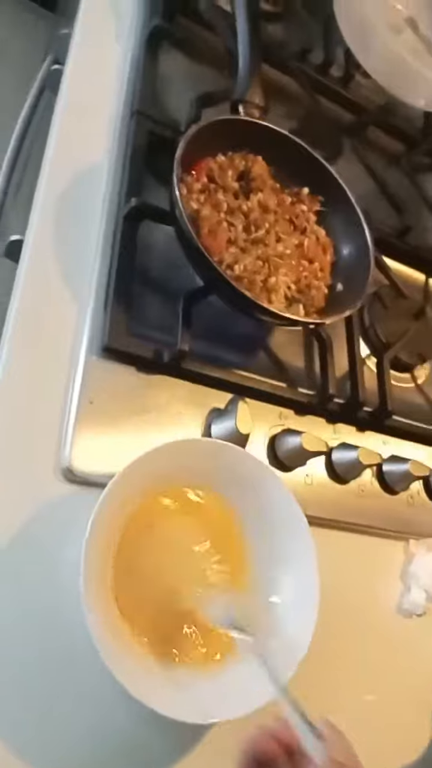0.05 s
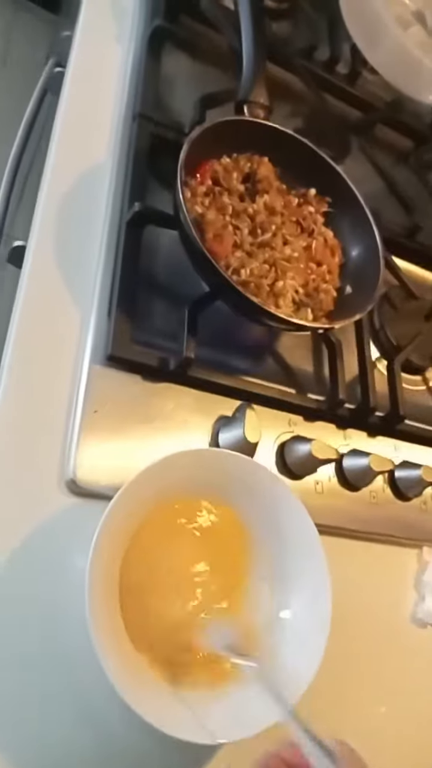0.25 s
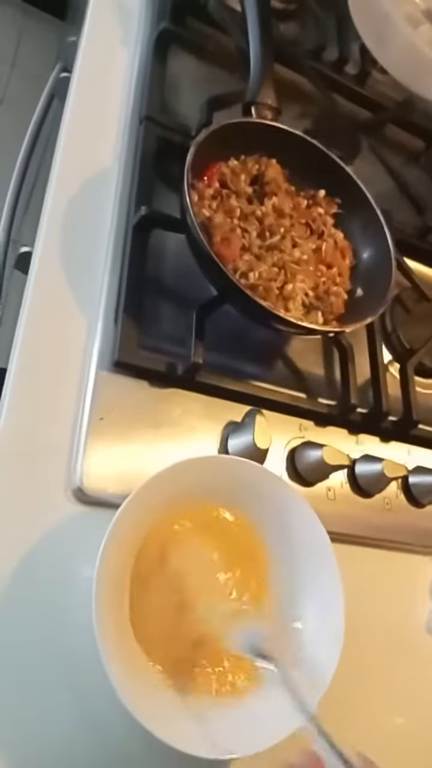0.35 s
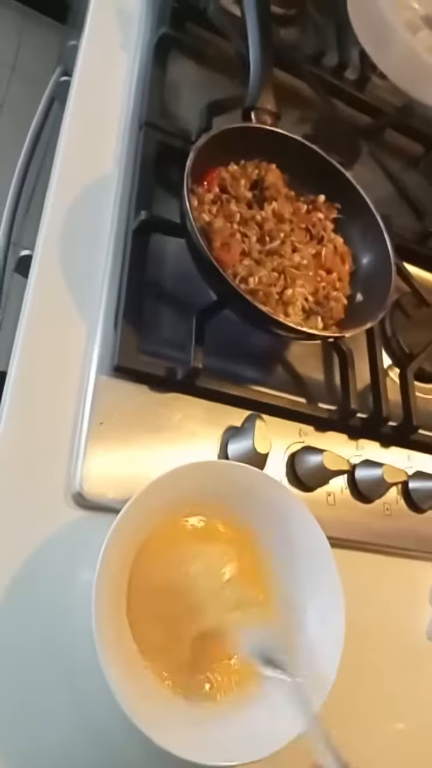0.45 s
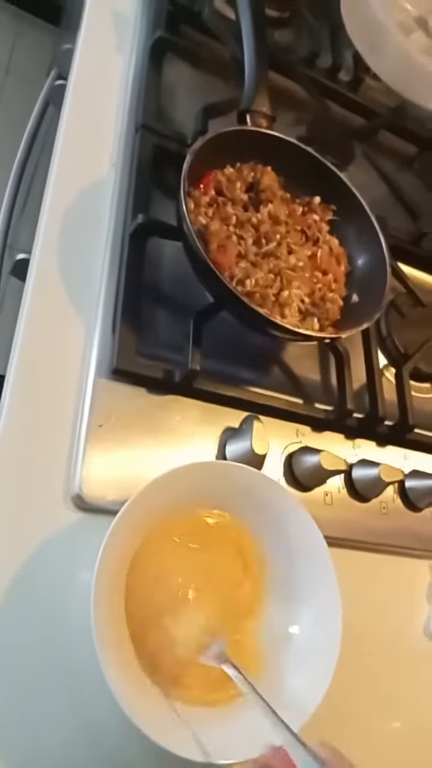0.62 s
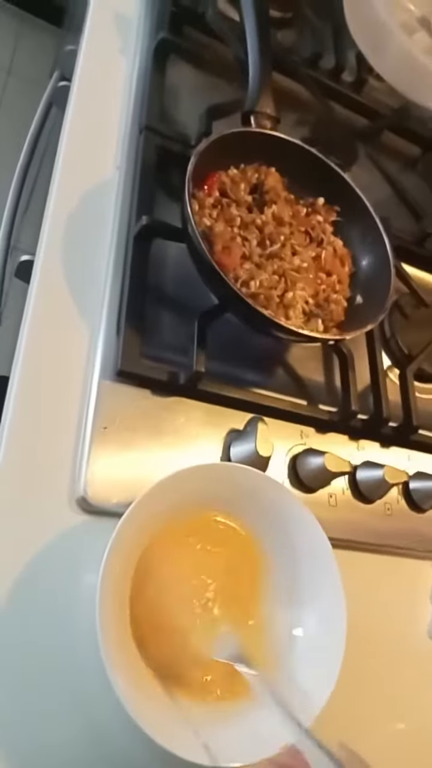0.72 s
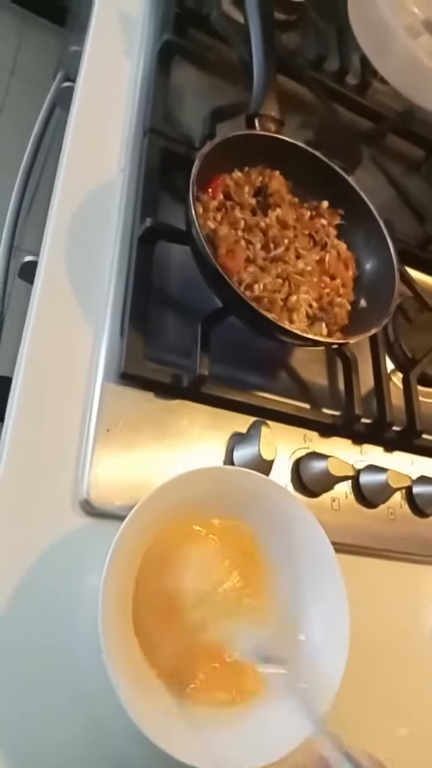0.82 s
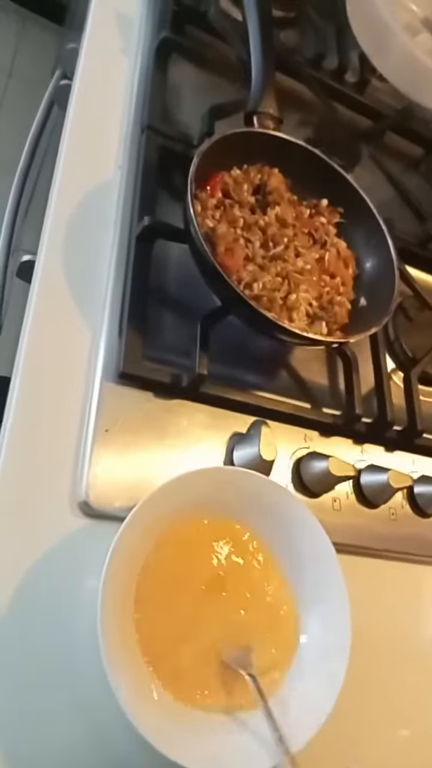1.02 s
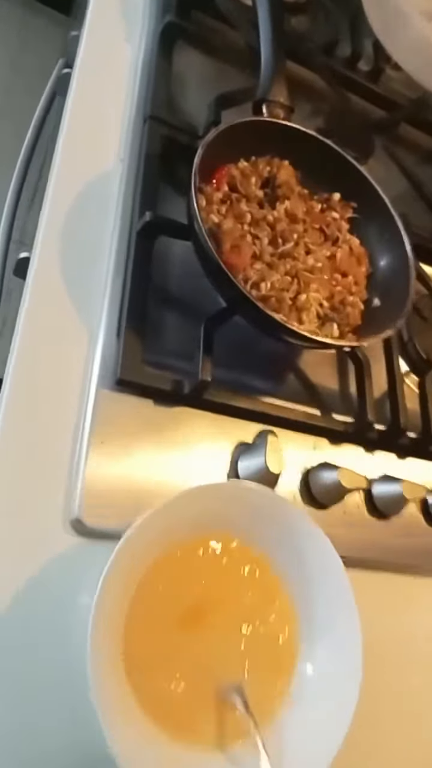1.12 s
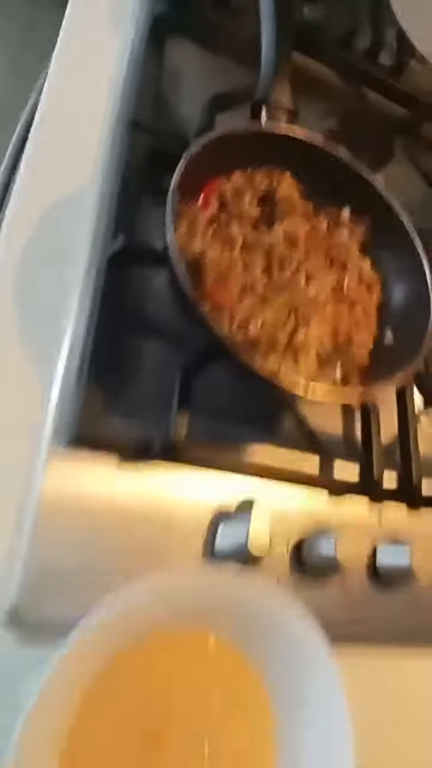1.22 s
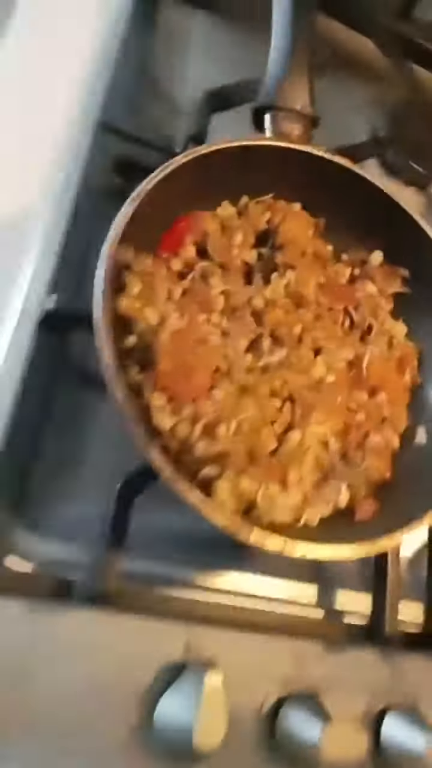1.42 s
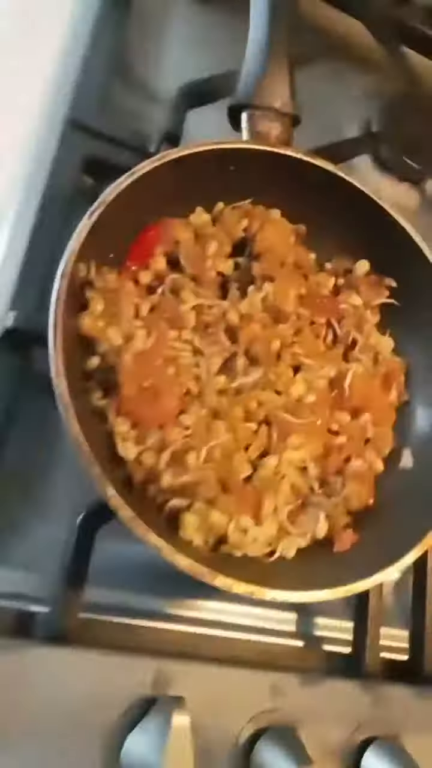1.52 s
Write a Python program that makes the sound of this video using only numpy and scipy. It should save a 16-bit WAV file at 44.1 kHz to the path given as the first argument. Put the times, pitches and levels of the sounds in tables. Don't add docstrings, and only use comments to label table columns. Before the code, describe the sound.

Beating eggs with a steel fork in a ceramic bowl: from 0 to about 1.05 seconds, ten dry rattling strokes a second, uneven in force, with wet bubbly slops and low counter thumps. Around 1.12 the fork bounces brightly on the ringing rim, then slides briefly and damps it. Faint pan sizzle and kitchen hum continue, with small fat ticks from 1.25 to 1.52. Close microphone, short room echo.

```python
import sys
import numpy as np
from scipy import signal
from scipy.fft import rfft, irfft
from scipy.io import wavfile
from scipy.ndimage import uniform_filter1d

SR = 44100
rng = np.random.default_rng(int(sys.argv[2]) if len(sys.argv) > 2 else 0)


def magnitude_from_level(level_db):
    exponent = np.asarray(level_db, float) / 20
    return 10 ** exponent


def put_to_file(sound):
    columns = np.atleast_2d(sound).T
    safe = np.clip(columns, -1, 1)
    whole_steps = np.round(safe * 32767)
    wavfile.write(sys.argv[1], SR, whole_steps.astype(np.int16))


N = 68355
LEAD = 2048

# frequency_hz, density_db
KITCHEN_COLOUR = [(40, -5), (115, 1), (200, -10.5), (1100, -22), (2100, -15.5), (4500, -20.5), (7500, -36),
                  (12000, -35.5)]
# frequency_hz, density_db
ECHO_COLOUR = [(60, -6), (300, 8), (1000, 1.5), (2000, -4), (5000, -1.5), (7500, -1), (10000, -2.5),
               (14000, -3.5)]
# start_s, level_db, pitch_hz
PAN_TICKS = [
    (1.249, -32.5, 1800),
    (1.272, -48, 2400),
    (1.292, -39, 1900),
    (1.298, -37, 3810),
    (1.339, -64, 6400),
    (1.353, -38.5, 4560),
    (1.369, -45.5, 890),
    (1.424, -38, 4150),
    (1.524, -41.5, 2080),
]
# start_s, level_db, crack_db
RIM_KNOCKS = [
    (1.117, -25.5, -5),
    (1.1192, -17.5, -10),
    (1.123, -12.5, -9),
    (1.126, -15.5, -22),
    (1.138, -22.5, -4.5),
]
# frequency_hz, peak_db, t60_s
RIM_MODES = [(773, -22.5, 0.22), (1800, -19, 0.038), (2135, -24.5, 0.061), (3304, -20.5, 0.39),
             (3250, -14.5, 0.19), (3380, -25, .14), (3470, -20.5, 0.049), (4570, -25, 0.065),
             (4924, -26, 0.32), (4958, -19, .13), (6845, -22.5, 0.082), (8349, -32.5, 0.16),
             (9350, -21.5, 0.057), (11630, -23.5, 0.12)]
# frequency_hz, density_db
SCRAPE_COLOUR = [(400, 0), (1800, -2.5), (4800, -5.5), (5900, -41), (6900, -8), (7900, -14), (9300, -1.5),
                 (13000, -13.5)]
# start_s, level_db, length_s, bubble_pitch_hz
EGG_SLOPS = [(.0, -43, 0.027, 700), (0.1, -34, 0.029, 690), (0.199, -29, 0.045, 724),
             (0.289, -31, 0.027, 759), (0.387, -46, 0.031, 712), (0.48, -45, 0.031, 637),
             (0.583, -39.5, 0.024, 643), (0.687, -33.5, 0.039, 923), (.788, -37, .03, 660),
             (0.874, -32.5, .04, 788), (0.973, -48.5, 0.044, 600), (1.048, -48.5, 0.027, 910),
             (1.144, -32.5, 0.049, 648)]
# start_s, level_db, knock_pitch_hz, treble_db, thump_db
FORK_STROKES = [(-.012, -21.5, 1614, -3, -8), (0.0863, -22.5, 1590, -2, -7.5),
                (0.1782, -29.5, 1860, -8, -31), (.189, -18.5, 1654, -6, -9), (0.2832, -15.5, 1590, -8, -20),
                (0.378, -19.5, 1695, -5, -7), (0.4746, -17, 2700, -8.5, -11),
                (0.5769, -17.5, 2107, -2, -8.5), (.6744, -18.5, 2340, -2, -8), (0.7708, -24, 2073, -1, -2),
                (.866, -24, 1583, -1, -2), (0.9635, -12.5, 1900, -2.5, -8), (1.045, -26, 1800, -18, -12)]
# frequency_hz, level_db, t60_s
BOTTOM_MODES = [(1003, -19, 0.044), (1590, -12.5, .045), (1900, -11, 0.014), (2134, -9, 0.02),
                (2450, -30.5, 0.036), (3010, -22, 0.018)]
# frequency_hz, level_db, t60_s
FORK_MODES = [(4200, -10, .02), (4700, 0, .03), (5500, -6, .018), (5800, -9, .02), (6870, -12, .015),
              (8000, -14, .015), (9170, -7, .022), (9630, -7, .022), (10200, -12, .015), (12300, -12, .015),
              (13610, -8, .03)]
# frequency_hz, level_db, t60_s
TINE_MODE = (17000, -27.5, 0.28)
# frequency_hz, level_db, t60_s
COUNTER_MODES = [(92, -11.5, 0.073), (138.5, -1.5, 0.067), (273.6, -9.5, 0.039), (330, 2, 0.034),
                 (401, -4.5, 0.045)]
# frequency_hz, density_db
CRACK_COLOUR = [(1000, -14.5), (2500, -5), (4700, 4), (6200, -6), (7800, -3), (9500, 2), (13500, -13),
                (14600, -36)]
# frequency_hz, density_db
RATTLE_COLOUR = [(200, -5.5), (400, -5.5), (1100, -18.5), (1550, 6), (2200, 1), (3000, -16.5), (5000, -24),
                 (9000, -27.5)]

KITCHEN_DB, FLICKER_DB = -50.5, 1
SIZZLE_DB, SIZZLE_PER_S, SIZZLE_SCATTER_DB = -63, 2300, 2
SPIT_S, SPIT_LENGTH_S, SPIT_DB, SPIT_HZ = 0.536, 0.033, -47.5, 9800
RIM_TOUCH_S, RIM_DAMPED_S, RIM_DAMP_DB = 0.004, 1.145, -10
SCRAPE_S, SCRAPE_LENGTH_S, SCRAPE_DB = 1.14, 0.045, -34
BUBBLES_PER_S, BUBBLE_CYCLES, BUBBLE_OCTAVES, BUBBLE_TILT_DB = 900, 2.19, 0.67, -6.5
SPLASH_DB, SLAP_DB = -15.5, -5
TINE_GAP_S, TINE_RISE_DB, TINE_FALL_DB, TINE_SCATTER_DB = 0.0013, 7.5, 9.5, 2
KNOCK_T60_S, THUMP_LATE_S, MODE_SCATTER_DB = 0.03, 0.002, 3.5
CRACK_DB, CRACK_T60_S, GRIT_DB, GRIT_T60_S = -2, 0.028, -13.5, 0.14
RATTLE_DB, RATTLE_T60_S = -6, 0.1
ECHO_DB, ECHO_T60_S, RIM_ECHO_DB = -14, 0.32, -12
SIDE_DB, SIDE_HZ = -25, 4600
LOW_CUT_HZ, QUIET_TOP_HZ, TOP_HZ = 70, 13200, 14400


def unit(x):
    return x / np.sqrt(np.mean(x ** 2) + 1e-30)


def colour(x, table):
    hz, db = np.array(table, float).T
    f = np.fft.rfftfreq(len(x), 1 / SR) + 1
    return irfft(rfft(x) * magnitude_from_level(np.interp(np.log(f), np.log(hz), db)), len(x))


def cut(x, hz):
    return signal.sosfilt(signal.ellip(8, 0.3, 60, hz, fs=SR, output="sos"), x)


def fade(t60, count=8192):
    return np.exp(-np.log(1000) * np.arange(count) / SR / max(t60, 1e-3))


def hold(length, release):
    t = np.arange(8192) / SR
    return np.minimum(t / 0.0046, 1) * magnitude_from_level(-60 * np.maximum(t - length, 0) / release)


def ring(modes, scatter_db, detune=0, count=8192):
    chance = rng.standard_normal((len(modes), 2))
    t = np.arange(count) / SR
    out = np.zeros(count)
    for (hz, db, t60), (a, b) in zip(modes, chance):
        tone = np.sin(2 * np.pi * hz * (1 + detune * b) * t)
        out += magnitude_from_level(db + scatter_db * a) * fade(t60, count) * tone
    return out


def crack(t60, table=CRACK_COLOUR):
    return unit(colour(rng.standard_normal(8192), table)) * fade(t60)


def add(out, s, x):
    i = int(round(s * SR)) + LEAD
    out[i:i + len(x)] += x[:len(out) - i]


def kitchen():
    out = np.zeros(N + LEAD)
    for hz in 40 * 2.0 ** np.arange(9):
        edges = [hz / 1.31, min(hz * 1.39, 16000)]
        octave = signal.butter(2, edges, "bandpass", fs=SR, output="sos")
        band = signal.sosfilt(octave, rng.standard_normal(N + LEAD))
        walk = uniform_filter1d(rng.standard_normal(N + LEAD), size=1500)
        walk = unit(uniform_filter1d(walk, size=1500))
        out += band * magnitude_from_level(FLICKER_DB * walk)
    return magnitude_from_level(KITCHEN_DB) * unit(colour(out, KITCHEN_COLOUR))


def pan():
    out = np.zeros(N + LEAD)
    for s, db, hz in PAN_TICKS:
        tick = ring([(hz, 0, 0.01), (1.2 * hz, -4, 0.008)], 0)
        add(out, s, magnitude_from_level(db) * (tick + magnitude_from_level(-18) * crack(0.008)))
    spit_colour = [(0.85 * SPIT_HZ, -30), (SPIT_HZ, 0), (1.12 * SPIT_HZ, -30)]
    add(out, SPIT_S, magnitude_from_level(SPIT_DB) * crack(1, spit_colour) * hold(SPIT_LENGTH_S, 0.03))
    chance, sign, size = rng.random((3, N + LEAD))
    pops = (chance < SIZZLE_PER_S / SR) * np.sign(sign - 0.5)
    pops = pops * magnitude_from_level(-SIZZLE_SCATTER_DB * np.log(size + 1e-9))
    return out + magnitude_from_level(SIZZLE_DB) * unit(colour(pops, CRACK_COLOUR))


def rim():
    touch, noise, tone = np.zeros((3, N + LEAD))
    for s, db, crack_db in RIM_KNOCKS:
        add(touch, s, magnitude_from_level(db) * rng.standard_normal(512) * fade(RIM_TOUCH_S, 512))
        clack = magnitude_from_level(crack_db) * crack(0.056, SCRAPE_COLOUR) * (1 - fade(0.006))
        add(noise, s, magnitude_from_level(db) * (clack + magnitude_from_level(-27) * ring(COUNTER_MODES, 0.82)))
    for hz, db, t60 in RIM_MODES:
        mode = signal.fftconvolve(touch, ring([(hz, 0, t60)], 0, count=22050))[:N + LEAD]
        tone += magnitude_from_level(db) * mode / abs(mode).max()
    add(noise, SCRAPE_S, magnitude_from_level(SCRAPE_DB) * crack(1, SCRAPE_COLOUR) * hold(SCRAPE_LENGTH_S, 0.092))
    t = (np.arange(N + LEAD) - LEAD) / SR
    damped = np.clip((t - RIM_DAMPED_S) / 0.0021, 0, 1)
    return cut(noise, 13100) + tone * magnitude_from_level(RIM_DAMP_DB * damped)


def slops():
    out = np.zeros(N + LEAD)
    t = np.arange(1024) / SR
    for s, db, length, hz in EGG_SLOPS:
        for when, size, loudness, keep in rng.random((60, 4)):
            if keep >= BUBBLES_PER_S * 2 * length / 60:
                continue
            octave = BUBBLE_OCTAVES * (3.415 * size ** 2 - 0.7)
            f = hz * 2 ** octave
            bubble_db = db - 55 * max(when - 0.35, 0) + BUBBLE_TILT_DB * abs(octave) + 7.74 * loudness
            swell = min(when / 0.05, 1) * magnitude_from_level(bubble_db)
            chirp = np.sin(2 * np.pi * f * t * (1 + 0.032 * f * t))
            bubble = chirp * np.exp(-t * f / BUBBLE_CYCLES) * np.minimum(t * f, 1)
            add(out, s + 2 * when * length, swell * bubble)
        rise = 1 - fade(length)
        add(out, s, magnitude_from_level(db + SLAP_DB) * crack(5 * length, RATTLE_COLOUR) * rise)
        add(out, s, magnitude_from_level(db + SPLASH_DB) * crack(4 * length) * rise)
    return cut(out, QUIET_TOP_HZ)


def tine_contacts():
    chance, k = rng.standard_normal((5, 2)), np.arange(-1, 4)
    at = (k + 1 + 0.3 * chance[:, 0]) * TINE_GAP_S * SR
    db = np.where(k < 0, TINE_RISE_DB * k, -TINE_FALL_DB * k) + TINE_SCATTER_DB * chance[:, 1]
    tines = np.zeros(512)
    np.add.at(tines, np.clip(at, 0, 511).astype(int), magnitude_from_level(db))
    return tines


def strokes():
    out = np.zeros(N + LEAD)
    for s, db, hz, treble_db, thump_db in FORK_STROKES:
        tines = tine_contacts()
        low = ring([(hz, 0, KNOCK_T60_S)] + BOTTOM_MODES, MODE_SCATTER_DB, 0.012)
        low += magnitude_from_level(RATTLE_DB) * crack(RATTLE_T60_S, RATTLE_COLOUR)
        high = magnitude_from_level(-8) * ring(FORK_MODES, MODE_SCATTER_DB, 0.0088) + ring([TINE_MODE], 2.6)
        grit = magnitude_from_level(GRIT_DB) * cut(crack(GRIT_T60_S), QUIET_TOP_HZ)
        high += magnitude_from_level(CRACK_DB) * (crack(CRACK_T60_S) + grit) * (1 - fade(0.0061))
        low, high = signal.fftconvolve(tines, low), signal.fftconvolve(tines, high)
        knock = low / abs(low).max() + magnitude_from_level(treble_db) * high / abs(high).max()
        add(out, s - TINE_GAP_S, magnitude_from_level(db) * knock)
        thump = ring(COUNTER_MODES, 1, 0.029) * (1 - fade(0.013))
        add(out, s + THUMP_LATE_S, magnitude_from_level(db + thump_db) * thump)
    return out


def scene():
    beating, knock = strokes() + slops(), rim()
    tail = colour(rng.standard_normal(22050), ECHO_COLOUR)
    tail = tail * fade(ECHO_T60_S, 22050) * (1 - fade(0.026, 22050))
    tail = tail / np.sqrt(np.sum(tail ** 2))
    echo = signal.fftconvolve(beating + magnitude_from_level(RIM_ECHO_DB) * knock, tail)[:N + LEAD]
    far = cut(magnitude_from_level(ECHO_DB) * echo + pan() + kitchen(), QUIET_TOP_HZ)
    mid = (beating + knock + far)[LEAD:]
    smeared = np.convolve(mid, unit(rng.standard_normal(64)) / 8, "same")
    treble = signal.butter(6, SIDE_HZ, "highpass", fs=SR, output="sos")
    side = magnitude_from_level(SIDE_DB) * signal.sosfilt(treble, smeared)
    return np.array([mid + side, mid - side])


def top_cut(x):
    return signal.sosfilt(signal.butter(12, 15100, fs=SR, output="sos"), x)


def record(dry):
    low_cut = signal.butter(2, LOW_CUT_HZ, "highpass", fs=SR, output="sos")
    mix = cut(signal.sosfilt(low_cut, dry), TOP_HZ)
    return top_cut(mix)


dry = scene()
out = record(dry)
put_to_file(out)
```